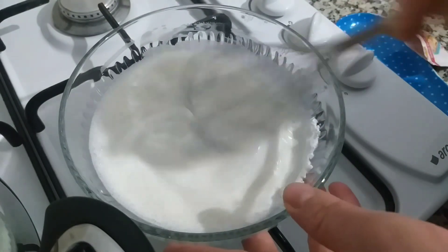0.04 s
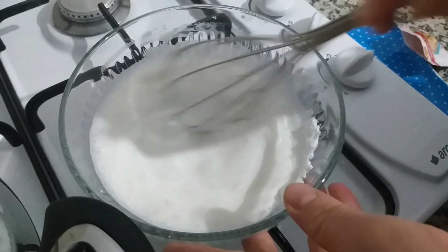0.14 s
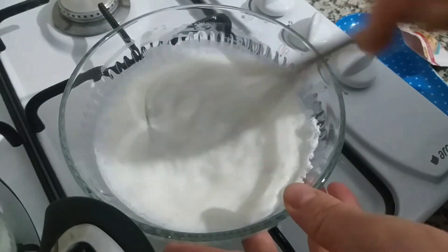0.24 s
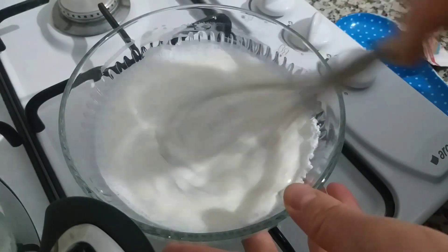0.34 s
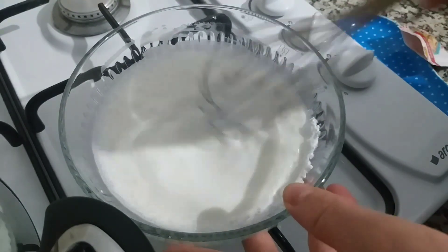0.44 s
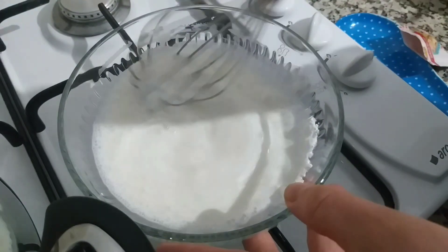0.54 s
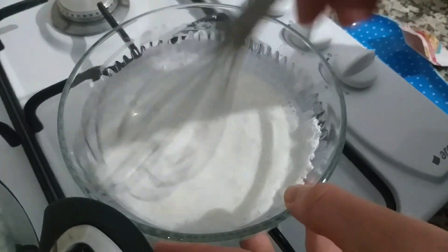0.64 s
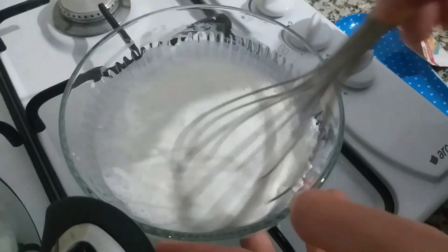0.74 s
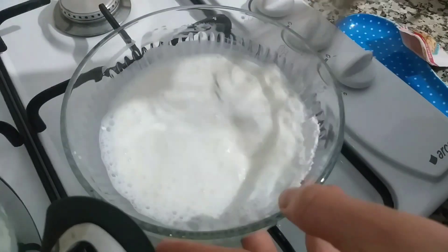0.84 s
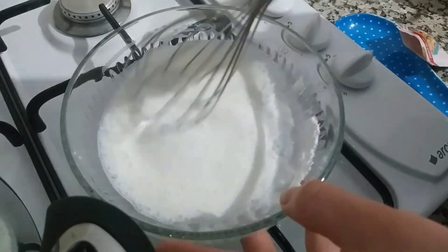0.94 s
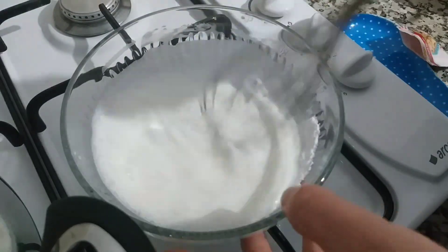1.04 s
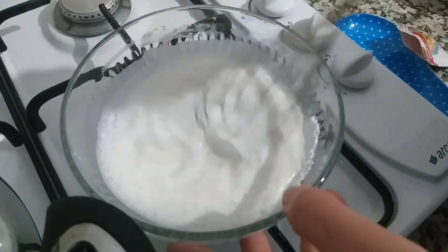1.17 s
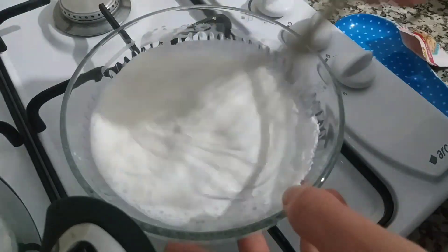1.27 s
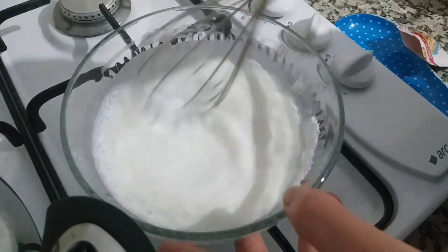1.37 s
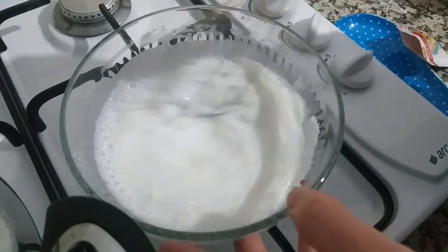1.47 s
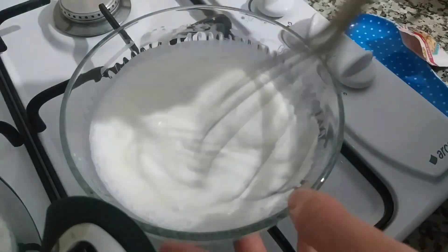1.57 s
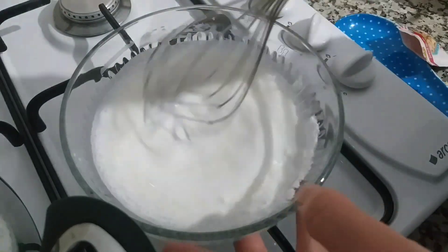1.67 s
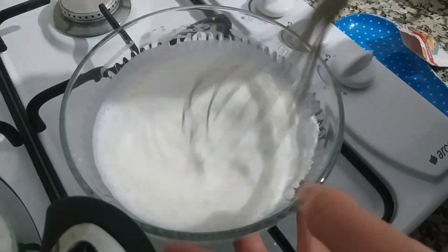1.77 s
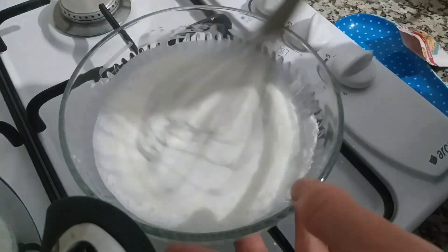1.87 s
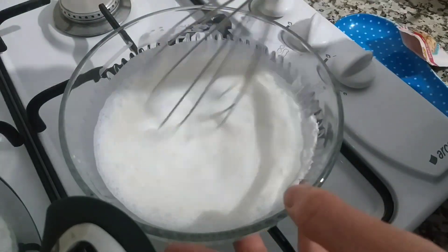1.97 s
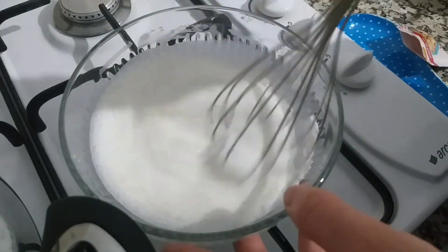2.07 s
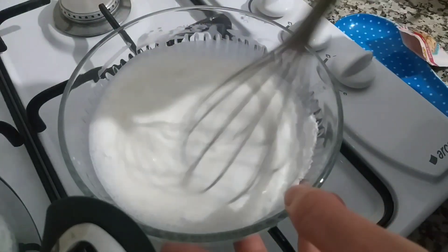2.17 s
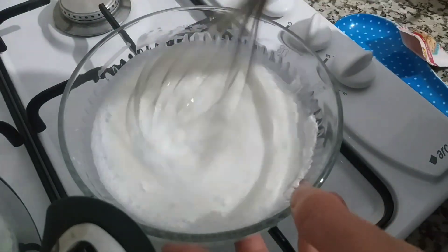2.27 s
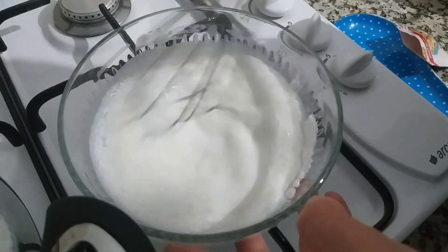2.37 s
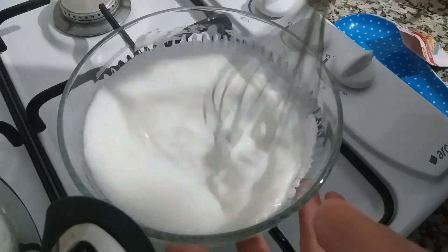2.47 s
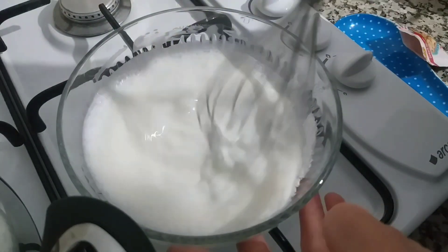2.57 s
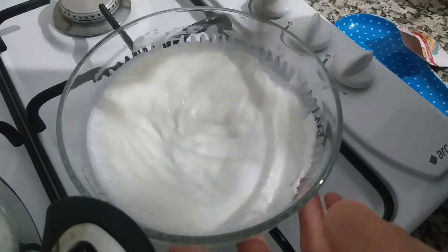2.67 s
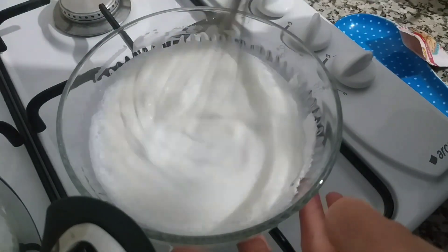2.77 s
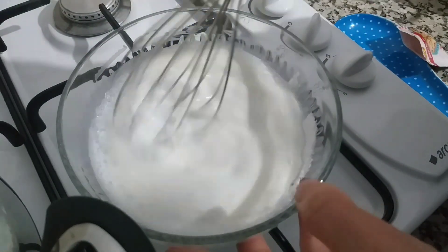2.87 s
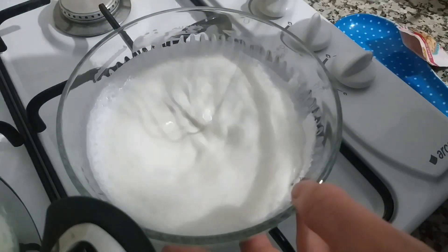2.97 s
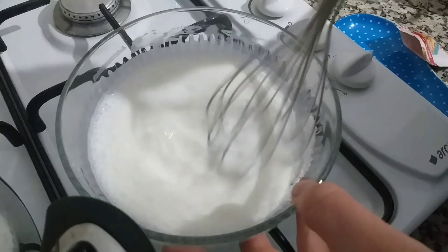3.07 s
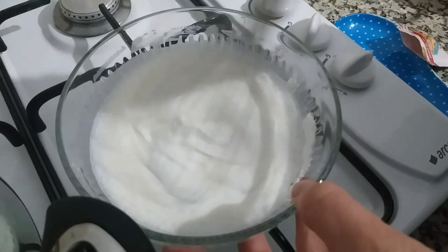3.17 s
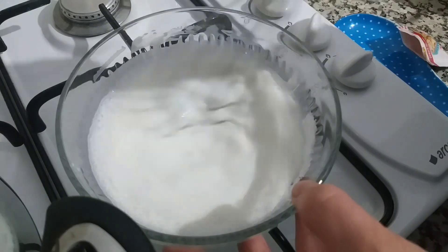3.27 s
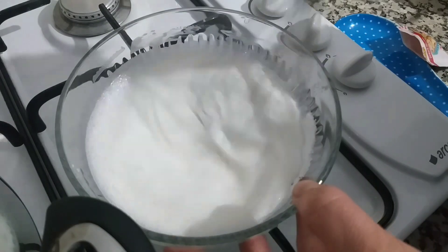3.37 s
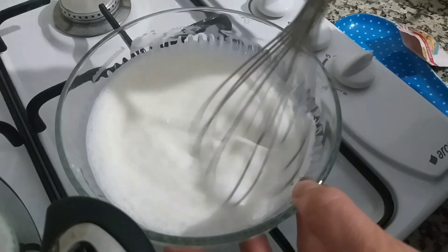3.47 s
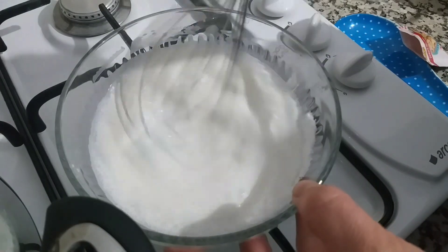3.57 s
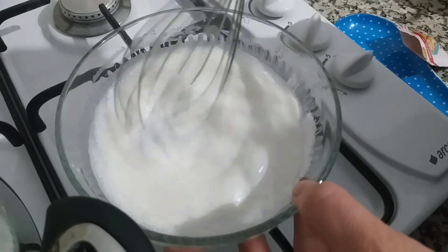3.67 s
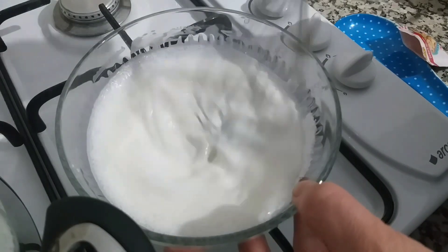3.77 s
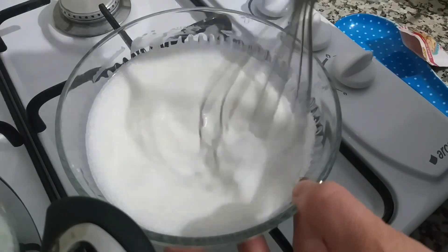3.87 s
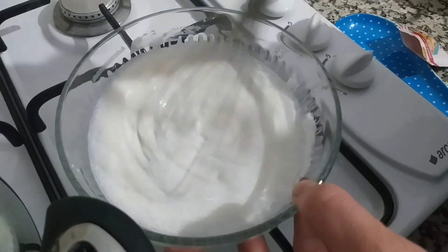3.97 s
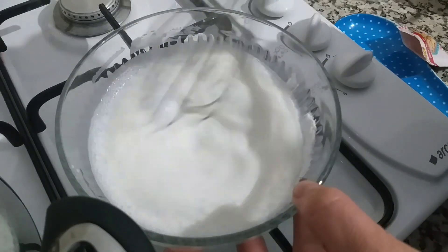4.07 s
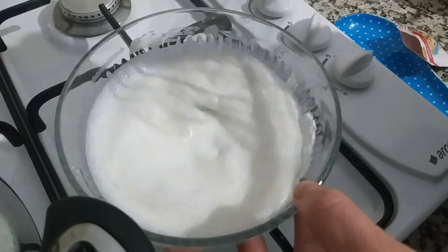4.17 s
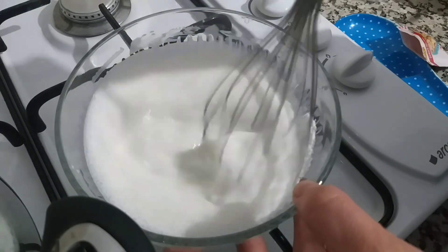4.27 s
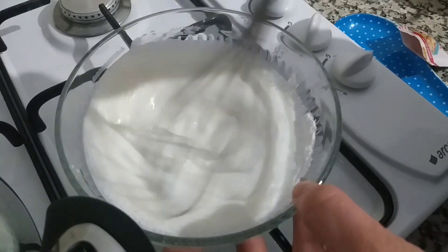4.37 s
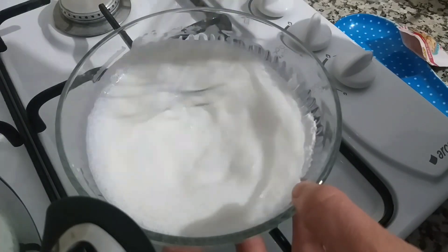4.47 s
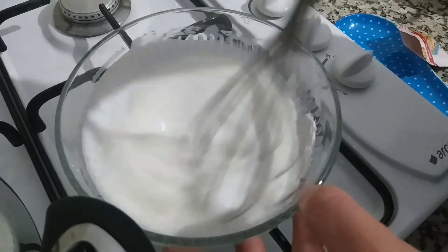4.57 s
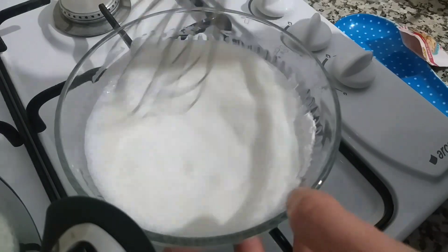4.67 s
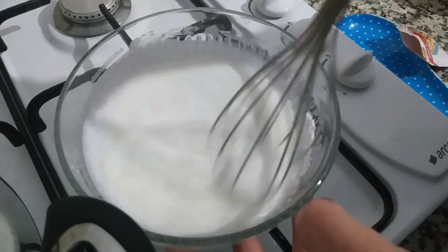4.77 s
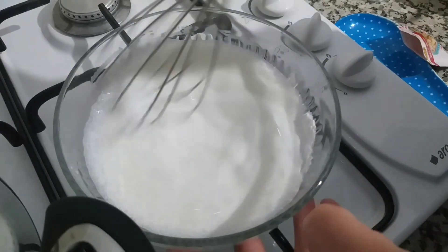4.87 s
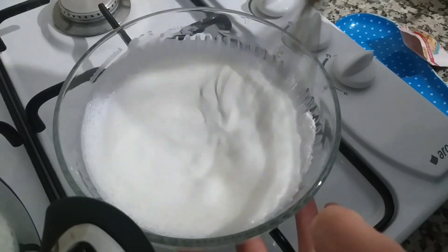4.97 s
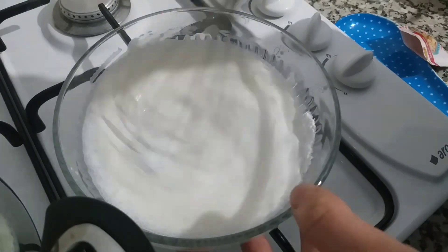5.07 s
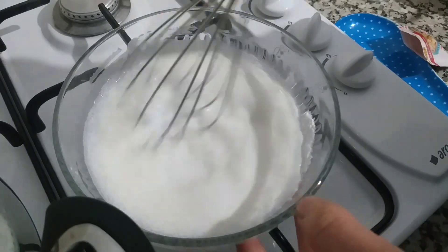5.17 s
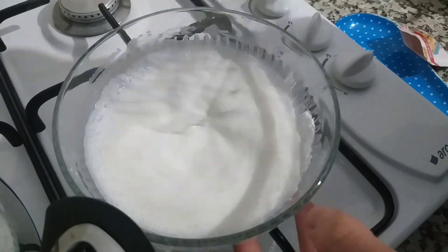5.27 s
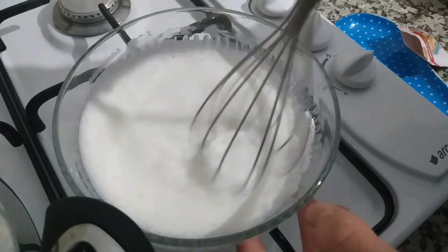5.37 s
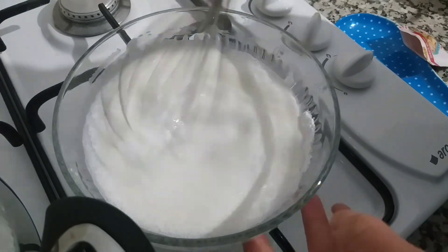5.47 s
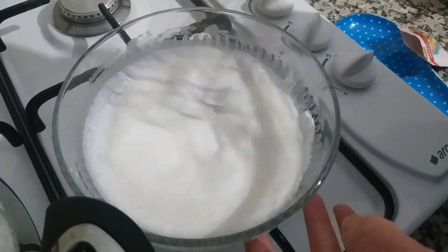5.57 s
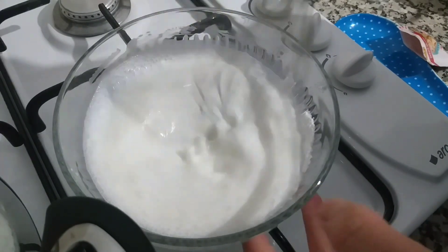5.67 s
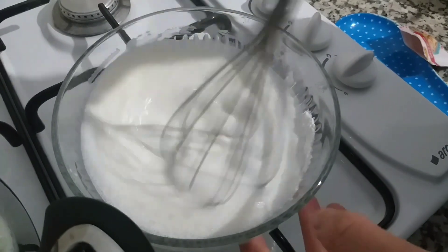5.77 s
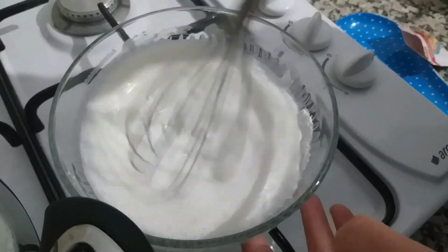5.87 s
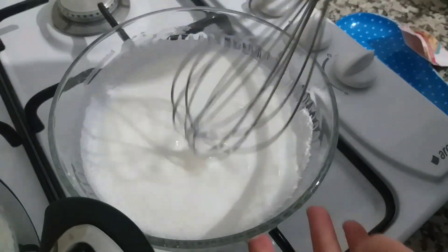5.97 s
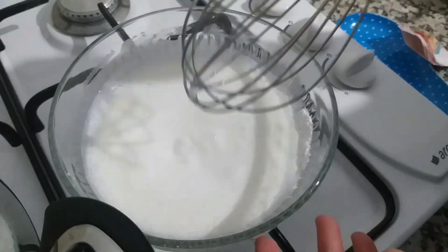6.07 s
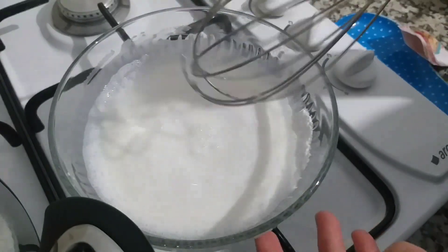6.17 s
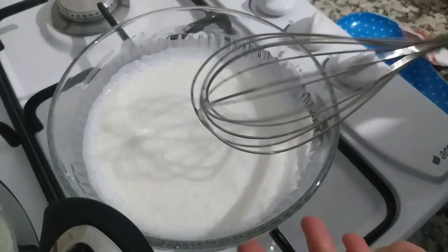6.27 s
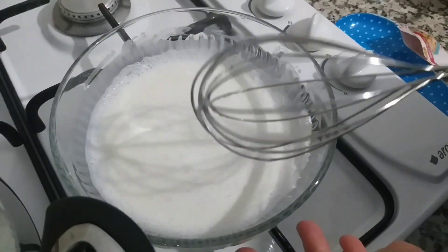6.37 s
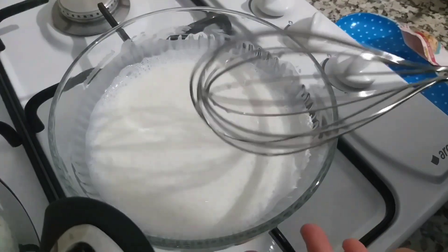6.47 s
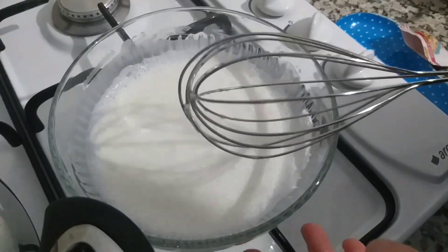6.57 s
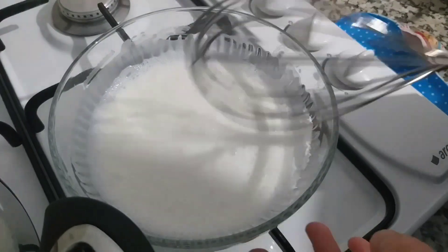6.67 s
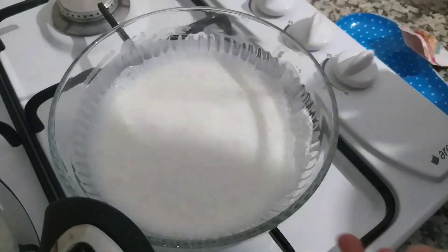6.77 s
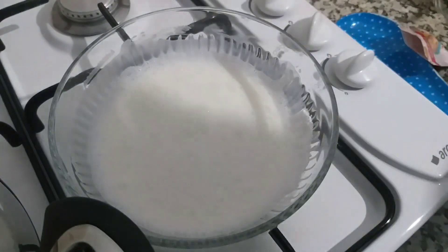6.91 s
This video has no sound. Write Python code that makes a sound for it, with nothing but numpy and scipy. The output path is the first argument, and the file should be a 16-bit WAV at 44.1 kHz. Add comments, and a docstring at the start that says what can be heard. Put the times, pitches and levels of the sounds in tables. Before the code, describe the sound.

A wire whisk beats thin batter in a glass bowl, close to the microphone and straight ahead. From the start the wires make quick, uneven, bright clicks on wet glass, with a gritty swish and tiny bubble pops underneath. Around 0.6 to 0.9 seconds the bowl bumps softly on a stove grate and the whisk hits the bare rim, making short glassy rings. The whisking goes quiet until about 1.4 seconds, then picks up again. From 2.2 to 5.9 seconds it is louder and busy, with small wet plops near 3.7 seconds and a brief easing with a low bump around 4.7. The beating stops at about 6 seconds. Between 6.3 and 6.6 seconds the whisk taps the rim about five times with ringing clinks and a soft knock. A short echo and the faint steady hush of a small kitchen lie behind everything.

```python
"""A wire whisk beats thin batter in a glass bowl on a stove grate, close to a stereo microphone.
Each stroke throws a volley of wires against the wet glass; blows on the bare rim let the bowl ring.
The wires drag through the batter, the bowl rocks on the grate and bubbles burst in the froth.
Behind it all are the short echo and steady hush of a small kitchen."""
import sys
import numpy as np
from scipy import signal
from scipy.fft import rfft, irfft, next_fast_len
from scipy.io import wavfile
from scipy.ndimage import uniform_filter1d

SR = 44100
rng = np.random.default_rng(int(sys.argv[2]) if len(sys.argv) > 2 else 0)


def wav_out(sig):
    """Save sig, one row per channel (or a flat mono array), as 16-bit PCM at SR to the path in sys.argv[1]."""
    wavfile.write(sys.argv[1], SR, np.round(np.clip(np.atleast_2d(sig).T, -1, 1) * 32767).astype(np.int16))


N = 306054

# Wires on wet glass. Each row: start in seconds, level in dB, loudest wire in Hz, length in ms.
VOLLEYS = [(.0079, -26.5, 6300, 2.56), (0.0536, -25, 5040, 8.2), (0.1163, -32, 5240, 12),
           (0.1489, -31.5, 5000, 5.7), (0.1893, -29, 7200, 5.5), (0.244, -28.5, 5400, 4),
           (.253, -26.5, 4900, 13.9), (0.3083, -26, 6600, 2.6), (0.3347, -36.5, 2070, 2.6),
           (0.3557, -27, 4830, 6.8), (.4668, -36, 3730, 10.8), (0.5837, -35.5, 5600, 6),
           (0.5941, -26, 5400, 3), (0.606, -26.5, 6530, 13.4), (0.962, -49.5, 4300, 2.34),
           (1.079, -46.5, 4250, 5.9), (1.1156, -44, 5430, 11), (1.1542, -42, 5050, 4.2),
           (1.2266, -50.5, 7700, 19), (1.272, -50, 4330, 2.2), (1.3807, -28.5, 4210, 7.4),
           (1.418, -29.5, 4840, 11.8), (1.5446, -25.5, 5270, 2.32), (1.562, -34, 5340, 11.6),
           (1.6312, -40, 4030, 3.7), (1.723, -39.5, 4970, 17.6), (1.7952, -28, 4970, 9.7),
           (1.8546, -36, 3920, 3.6), (1.9087, -31, 2060, 10.8), (1.961, -32, 4250, 7.9),
           (2.026, -29.5, 4200, 10.3), (2.0539, -32, 7900, 4.6), (2.11, -41.5, 4160, 15.5),
           (2.1511, -39, 4780, 5.7), (2.1701, -28.5, 7950, 5.8), (2.1834, -36.5, 4770, 5.7),
           (2.23, -24.5, 4270, 12.4), (2.2835, -21, 7150, 8.7), (2.3184, -38.5, 4700, 4.5),
           (2.3674, -37, 7650, 11), (2.4198, -18.5, 5600, 13.6), (2.483, -32, 3980, 13.4),
           (2.5408, -26.5, 8300, 15), (2.5734, -32, 7880, 4.1), (2.6177, -26, 5100, 6.7),
           (2.655, -22, 7700, 11), (2.7235, -22.5, 8300, 4.8), (2.7849, -24, 7100, 15),
           (2.8415, -20, 8100, 6.1), (2.8952, -38.5, 6880, 5), (2.913, -22, 7800, 8.9),
           (2.9733, -22, 4570, 10.3), (3.05, -31, 7500, 1.7), (3.0698, -34.5, 7800, 3.6),
           (3.0971, -35.5, 4120, 8.1), (3.11, -39.5, 7060, 16), (3.1325, -33.5, 6950, 5.5),
           (3.1852, -22, 6460, 12.9), (3.2308, -35.5, 7670, 8.9), (3.257, -32.5, 4200, 11.1),
           (3.3072, -39, 5030, 6.3), (3.3204, -29, 4250, 12.6), (3.366, -37, 1970, 2.7),
           (3.4002, -26, 5100, 9.4), (3.4466, -23, 7100, 5.3), (3.4613, -24.5, 7250, 13.3),
           (3.52, -25.5, 6600, 5.2), (3.577, -24.5, 6800, 17), (3.6083, -26.5, 4470, 7.9),
           (3.6471, -26.5, 6900, 8.9), (3.7231, -20.5, 4230, 11.8), (3.7868, -26, 6700, 9.5),
           (3.8392, -19, 4370, 11.1), (3.8586, -24, 4700, 11), (3.911, -23.5, 5650, 7.8),
           (3.971, -31.5, 1880, 18), (4.0042, -33.5, 2060, 7.2), (4.0478, -26, 6500, 8),
           (4.1105, -26.5, 7500, 12.4), (4.1344, -37, 4540, 6.2), (4.1625, -27.5, 4400, 12),
           (4.2, -46, 1820, 4), (4.235, -18, 4300, 14.5), (4.2955, -25.5, 7100, 10.7),
           (4.3943, -27.5, 7100, 12.8), (4.4335, -26.5, 7200, 13.5), (4.5828, -27.5, 7650, 5.5),
           (4.6042, -35.5, 6960, 29), (4.6662, -37.5, 7650, 3), (4.696, -40.5, 3720, 3.3),
           (4.7835, -37.5, 4690, 12), (4.8027, -41.5, 3280, 17.7), (4.831, -26.5, 4400, 4.9),
           (4.9176, -34, 7200, 6.8), (4.951, -31, 4020, 10.7), (4.9783, -28, 7800, 11.7),
           (5.0885, -25, 4350, 10), (5.141, -23, 8100, 7.9), (5.208, -23, 5700, 3.7),
           (5.2755, -26.5, 8400, 9.6), (5.3496, -24, 5000, 14.8), (5.4103, -23.5, 6660, 11),
           (5.4895, -24.5, 7340, 17.7), (5.5493, -25.5, 4130, 14.4), (5.6209, -19.5, 4550, 13.9),
           (5.6749, -21.5, 3440, 8), (5.7383, -33.5, 5210, 7.7), (5.7577, -24, 4120, 19.6),
           (5.8149, -20, 4910, 10.7), (5.8587, -32, 6560, 7.2), (5.8861, -22.5, 7160, 2.82)]
# Blows on the bare rim. Each row: start in seconds, ring in dB, place from 0 (back) to 1 (side),
# chatter length in ms, extra dB on the low modes, wire ticks in dB.
RIM_BLOWS = [(.647, -32.5, .01, 6, 12, -44), (.722, -37, 0.93, 7, 6, -51), (.770, -24.5, .01, 3.7, -9, -43),
             (.795, -36, .01, 7.3, 3, -53), (.860, -28.5, 0.13, 14.8, 8.5, -36.5),
             (6.268, -24.5, 0.94, 19.6, -7, -49), (6.295, -24, 0.74, 14, -2, -65),
             (6.390, -34, .99, 20.5, -8, -47.5), (6.454, -23, 0.86, 13.5, 7.5, -32),
             (6.531, -22.5, 0.91, 11, 10.5, -29.5)]
# Effort of the stirring hand. Each row: time in seconds, level of the dragging wires in dB.
STIR_EFFORT = [(0, -53), (.33, -48), (.43, -71), (.57, -72), (.7, -52.5), (.95, -62), (1.1, -54.5),
               (1.33, -63), (1.45, -64), (1.59, -55), (1.71, -77), (1.86, -55.5), (2.46, -48),
               (3.09, -44.5), (3.17, -70), (3.48, -46), (4.28, -46), (4.47, -47), (4.55, -51), (4.65, -51),
               (4.95, -53), (5.2, -48.5), (5.86, -43), (6.02, -77.5), (6.94, -71)]


def volley(db, wire_hz, length_ms, bare_db=0, size=4096, count=36):
    """Wires land one after another; each tick shivers briefly in the damped glass."""
    # Colour of a tick on batter-damped glass. Each row: frequency in Hz, level in dB.
    wet_glass = [(350, -48.5), (600, -22), (697, -29.5), (868, -12), (1690, -8.5), (1940, -1.5),
                 (2550, -12.5), (2890, -6), (3740, -6.5), (4410, -1.5), (6120, -7.5), (7010, 0.5),
                 (9730, -17), (12100, -9.5), (15700, -16)]
    t, hz = np.arange(size) / SR, np.fft.rfftfreq(size, 1 / SR)
    lag, force = rng.random((2, count))
    length = np.clip(length_ms, 1, 50) * SR / 1000
    landing = (np.arange(count) + lag - lag[0]).clip(0) / count
    strengths = gain_of(-3.5 * np.log(1.01 - force)) * rng.choice([-1, 1], count)  # a few land hard
    ticks = np.zeros(size)
    np.add.at(ticks, (landing * length).astype(int), strengths)
    lateness = np.minimum(rng.exponential(1, count // 4), 4)
    bounces = (length + lateness * 13 * SR / 1000).astype(int)  # some bounce back, about 13 ms later
    np.add.at(ticks, bounces, strengths[::4] * gain_of(-9.5 - 3.4 * lateness))
    quick, slow = rng.standard_normal((2, size))
    quick *= gain_of(-60 * t / 0.011) + gain_of(-5 - 60 * t / 0.061)
    quick[0] += 4.0
    slow *= gain_of(-60 * t / 0.07) * (1 - np.exp(-t / 0.0066))  # low modes build up and last longer
    low = 1 / (1 + (hz / 1500) ** 4)
    shiver = (1 - low) * rfft(evened(quick)) + low * rfft(evened(slow))
    # Hard volleys are brighter; long, glancing ones are duller.
    treble_db_per_octave = 10.5 + 0.4224 * db - .2 * length_ms + bare_db
    colour_db = read(wet_glass, hz) + treble_db_per_octave * np.clip(np.log2(hz / 6000 + 1e-9), 0, .9)
    colour_db += 5.0 / (1 + ((hz - wire_hz) / 330) ** 2)  # the hardest wire sings its own note
    sound = irfft(rfft(ticks) * shiver * causal(colour_db), size)
    return gain_of(db) * sound / np.sqrt(np.mean(sound[:int(length) + 130] ** 2))


def rim_blow(db, place, length_ms, low_db):
    """Wires chatter on the free bowl and keep it ringing; the ring drops as they come to rest on it."""
    # Each row: mode in Hz, dB when struck at the back, dB when struck at the side, t60 in seconds.
    bowl_modes = [(872, -25, -28, .26), (1938, -23, -24, .33), (3240, -10, -13, .21), (4770, 0, -15, .18),
                  (6402, -13, 0, .15), (8242, -20, -14, .09), (12500, -13, -27, .06)]
    t = np.arange(SR // 2) / SR
    hz, back_db, side_db, t60 = np.array(bowl_modes).T[:, :, None]
    after = np.maximum(t - length_ms / 1000, 0)
    fade = .7 * gain_of(-60 * after / .03) + .3 * gain_of(-60 * after / t60)
    jolt, waver = evened(uniform_filter1d(rng.standard_normal((2, len(hz), len(t))), size=200, axis=2))
    turns = hz * t + rng.random((len(hz), 1))
    turns += .08 * jolt * np.exp(-after / .03)  # each touch jolts the phase
    level_db = db + back_db + np.clip(place, 0, 1) * (side_db - back_db) + low_db * (hz < 2500)
    modes = gain_of(level_db + 2 * waver) * fade * np.sin(2 * np.pi * turns)
    return modes.sum(0) * (1 - np.exp(-t / .002))


def drag():
    """Wet wires slip along the glass: dense grit in uneven clumps, each with its own colour."""
    # Each row: frequency in Hz, level in dB.
    drag_colour = [(400, -19.5), (900, -14), (1900, 0.5), (2600, -3.5), (4400, 1), (7200, -4),
                   (9500, -18.5), (12500, -27), (15700, -25.5)]
    _, t, spectra = signal.stft(rng.standard_normal(N), SR, nperseg=256)
    clumps = evened(uniform_filter1d(rng.standard_normal(len(t)), size=4))
    patches = uniform_filter1d(rng.standard_normal(spectra.shape), size=4, axis=0)
    patches = evened(uniform_filter1d(patches, size=9, axis=1))
    grit = signal.istft(spectra * gain_of(2.5 * clumps + 3.5 * patches), SR, nperseg=256)[1][:N]
    return gain_of(control(STIR_EFFORT)) * evened(coloured(grit, lambda hz: read(drag_colour, hz)))


def rocking_db():
    """How hard the bowl rocks: a tremble that follows the stirring, lurches, knocks from the wires."""
    # Lurches of the bowl on the grate. Each row: time of the peak in seconds, level in dB.
    lurches = [(.23, -68), (.49, -61.5), (0.602, -36.5), (0.644, -42), (.81, -44), (1.14, -61), (1.45, -55),
               (1.59, -60.5), (1.865, -44), (2.32, -52.5), (2.46, -52), (2.6, -51), (2.71, -46),
               (3.08, -44.5), (3.23, -45.5), (3.5, -43), (3.73, -48), (4.32, -49), (4.6, -46),
               (4.702, -36.5), (4.79, -47), (4.98, -48.5), (5.91, -46), (6.47, -46.5), (6.558, -42)]
    rise_db_per_s, hold_s, fall_db_per_s, knock_t60_s = 404.5, 0.01, 215, 0.21
    tremble_db = 10 + 1.34 * control(STIR_EFFORT)
    power = gain_of(2 * tremble_db)
    from_peak = np.arange(-SR // 4, SR // 2) / SR
    lurch_db = rise_db_per_s * np.minimum(from_peak, 0)
    lurch_db -= fall_db_per_s * np.maximum(from_peak - hold_s, 0)
    for s, db in lurches:
        skip = max(round((.25 - s) * SR), 0)
        add(power, s - .25, gain_of(2 * (db + lurch_db))[skip:])
    knock_db = -60 * np.arange(SR // 8) / SR / knock_t60_s
    for s, db, *_ in VOLLEYS:
        add(power, s, gain_of(2 * (db - 26.5 + knock_db)))
    for s, db, _, _, low_db, _ in RIM_BLOWS:  # blows rich in low modes knock hardest
        add(power, s, gain_of(2 * (db + 2 * low_db - 48 + knock_db)))
    return 10 * np.log10(power)


def rocking(sway_s=.09):
    """The held bowl shifts on the grate: uneven nudges into low, short resonances."""
    # Resonances of bowl and grate. Each row: centre in Hz, width in Hz, level in dB.
    grate_modes = [(128, 64, -7.5), (274.5, 29, 2.5), (405, 72, -5.5), (480, 40, -2), (875, 18, -2),
                   (1205, 220, -12.5)]

    def body_db(hz):
        """The resonances summed, rolling off below 75 Hz."""
        power = sum(gain_of(2 * db) / (1 + (2 * (hz - f) / width) ** 2) for f, width, db in grate_modes)
        return 10 * np.log10(power * (hz + 1) ** 4 / (hz ** 4 + 75 ** 4))

    nudges = rng.standard_normal(N)
    nudges *= gain_of(2.87 * evened(uniform_filter1d(rng.standard_normal(N), size=900)))
    rumble, level_db = evened(coloured(nudges, body_db)), rocking_db()
    deep = coloured(rumble, lambda hz: -10 * np.log10(1 + (hz / 190) ** 4))
    deep_db = uniform_filter1d(level_db, size=int(sway_s * SR))  # the heavy lowest mode follows slowly
    return gain_of(level_db) * (rumble - deep) + gain_of(deep_db) * deep


def bubble(db, hz, length_ms):
    """A small cavity rings and rises a little in pitch as it opens."""
    t = np.arange(3000) / SR
    age = t * 1000 / max(length_ms, 4)
    return gain_of(db) * 6 * age * np.exp(-3 * age) * np.sin(2 * np.pi * hz * t * (1 + 0.0058 * age))


def froth(count=600):
    """Many small bubbles burst at random moments, as strongly as the bowl rocks."""
    out, level_db = np.zeros(N), rocking_db()
    for when, pitch, size in rng.random((count, 3)):
        db = level_db[int(when * N)] - 7.0 + 10 * size
        add(out, when * N / SR, bubble(db, hz=500 * 4 ** pitch, length_ms=5 + 8 * size))
    return out


def kitchen_echo(x):
    """The small room answers with a short diffuse echo, each band dying at its own speed."""
    # Each row: frequency in Hz, t60 in seconds.
    room_decay = [(300, 0.04), (1500, 0.24), (5000, 0.093), (12000, 0.1)]
    hz, t, spectra = signal.stft(rng.standard_normal(SR // 2), SR, nperseg=128)
    tail = signal.istft(spectra * gain_of(-60 * t / read(room_decay, hz)[:, None]), SR, nperseg=128)[1]
    tail[:200] = 0  # the nearest surface answers after a few milliseconds
    return signal.fftconvolve(x, tail / np.linalg.norm(tail))[:N]


def hush(db=-71.5):
    """Steady air of the room."""
    # Each row: frequency in Hz, level in dB.
    air_colour = [(20, -6.5), (120, 13), (200, 6), (330, -4.5), (1500, -4), (4800, -22.5), (9000, -15.5),
                  (15500, -27.5)]
    return gain_of(db) * evened(coloured(rng.standard_normal(N), lambda hz: read(air_colour, hz)))


def gain_of(db):
    """Decibels to amplitude."""
    return 10 ** (np.asarray(db) / 20)


def evened(x):
    """Scales to rms 1."""
    return x / np.sqrt(np.mean(x ** 2) + 1e-20)


def read(points, hz):
    """Reads a curve on a log-frequency axis."""
    f, value = np.transpose(points)
    return np.interp(np.log(hz + 1), np.log(f + 1), value)


def control(rows):
    """A level curve, sample by sample."""
    return np.interp(np.arange(N) / SR, *np.transpose(rows))


def add(mix, s, sound):
    """Mixes a sound in at s seconds."""
    part = mix[max(round(s * SR), 0):][:len(sound)]
    part += sound[:len(part)]


def causal(db):
    """Minimum-phase response for a gain in dB over the rfft bins."""
    cepstrum = irfft(np.maximum(db, -100) * np.log(10) / 20)
    half = len(cepstrum) // 2
    cepstrum[1:half] *= 2
    cepstrum[half + 1:] = 0
    return np.exp(rfft(cepstrum))


def coloured(x, db_at):
    """Filters a long signal by a dB curve over frequency."""
    size = next_fast_len(N)
    return irfft(rfft(x, size) * gain_of(db_at(np.fft.rfftfreq(size, 1 / SR))), size)[..., :N]


def scene():
    """The bowl stands close to the microphone, straight ahead, with the kitchen faint behind it."""
    # Single bubbles in the batter. Each row: start in seconds, level in dB, pitch in Hz, length in ms.
    single_bubbles = [(1.873, -37.5, 1330, 5.9), (2.386, -32, 1640, 5.8), (3.612, -30, 884, 8.2),
                      (3.759, -24, 896, 4.7), (3.864, -28, 1110, 3.2), (5.934, -35, 1350, 5.3),
                      (6.012, -42, 1230, 4.3), (6.094, -60, 1520, 8.7), (6.115, -69, 1540, 14),
                      (6.158, -62, 1490, 17)]
    near = froth()
    for s, db, wire_hz, length_ms in VOLLEYS:
        add(near, s, volley(db, wire_hz, length_ms))
    for s, db, hz, length_ms in single_bubbles:
        add(near, s, bubble(db, hz, length_ms))
    for s, ring_db, place, length_ms, low_db, tick_db in RIM_BLOWS:
        add(near, s, rim_blow(ring_db, place, length_ms, low_db))
        # Ticks on bare glass keep more treble.
        add(near, s, volley(tick_db, wire_hz=6800, length_ms=length_ms, bare_db=10.5))
    mono = near + gain_of(-14) * kitchen_echo(near) + drag() + rocking() + hush()
    return np.array([mono, mono])


def record(dry):
    """The microphone's two ports differ a little in colour; the image is narrow and ends at 16 kHz."""
    # Each row: frequency in Hz, left port minus right port in dB.
    port_balance = [(1000, 0), (1300, 2.6), (2000, 2.6), (2400, 0)]
    # A faint smeared copy, added left and subtracted right, lets the two sides differ slightly. Each row:
    # frequency in Hz, level of the copy in dB.
    width_share = [(40, -22), (250, -60), (500, -53), (1500, -28), (4500, -48), (9000, -30.5),
                   (13000, -40.5)]
    smear = rng.standard_normal(300) * np.hanning(300)
    smeared = signal.oaconvolve(dry[0], smear / np.linalg.norm(smear))[:N]
    side = coloured(smeared, lambda hz: read(width_share, hz))
    channels = [coloured(x, lambda hz: sign * .5 * read(port_balance, hz)) + sign * side
                for x, sign in zip(dry, (1, -1))]
    band_limit = signal.firwin(511, 16000, window=("kaiser", 9), fs=SR)
    return signal.oaconvolve(np.array(channels), band_limit[None], "same")


dry = scene()
out = record(dry)
wav_out(out)
```